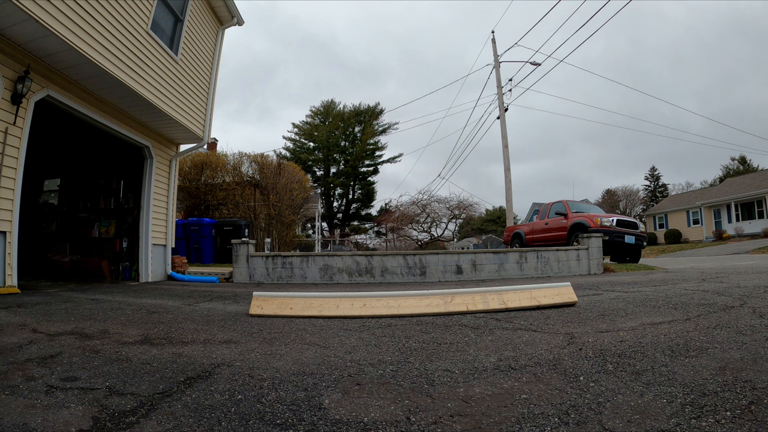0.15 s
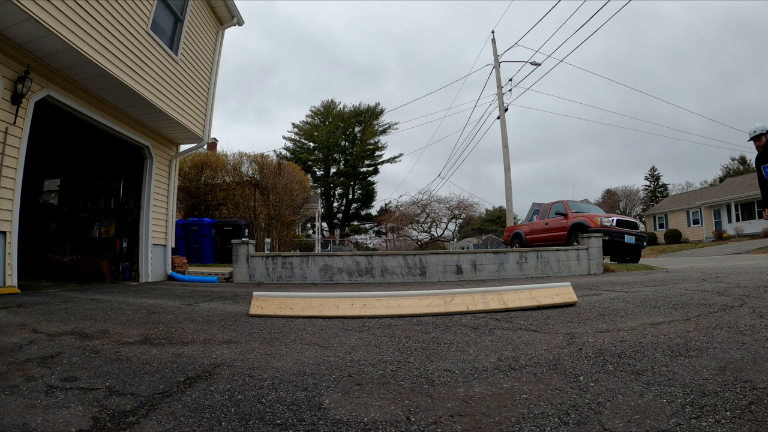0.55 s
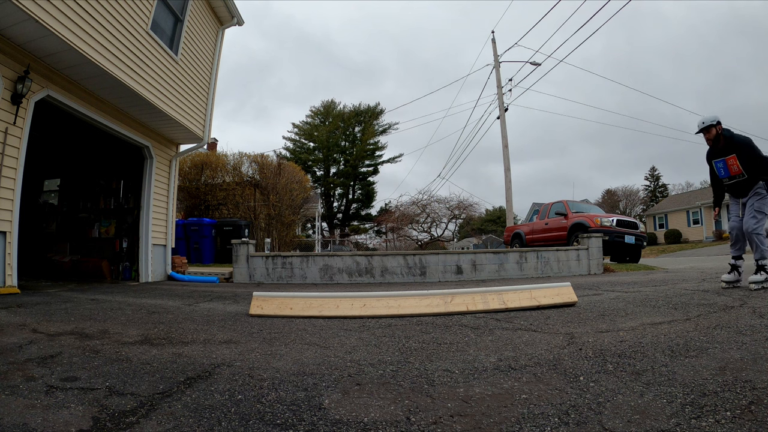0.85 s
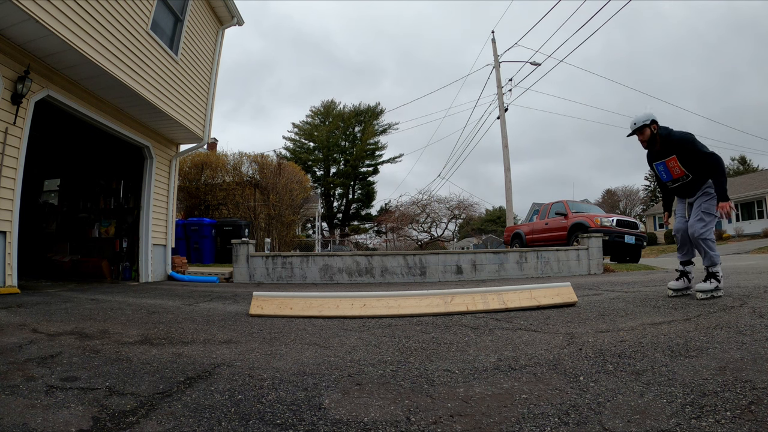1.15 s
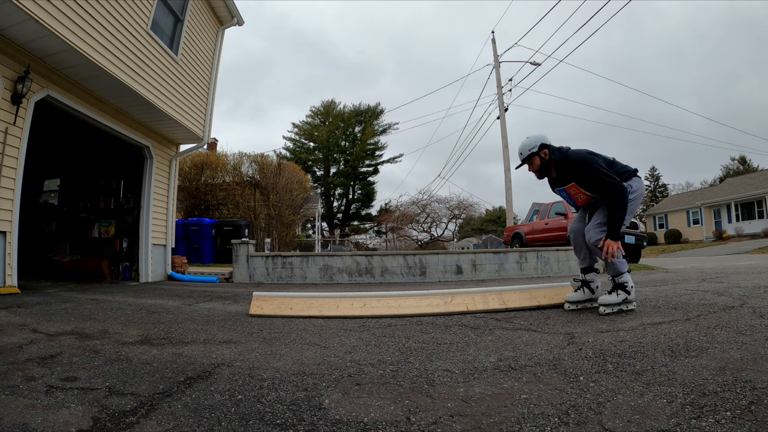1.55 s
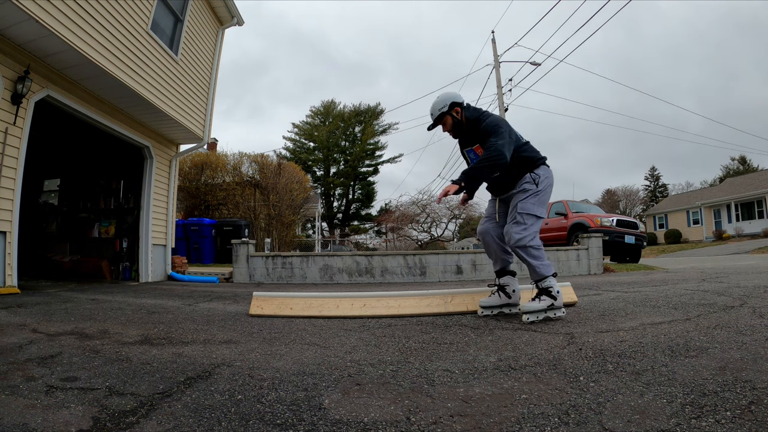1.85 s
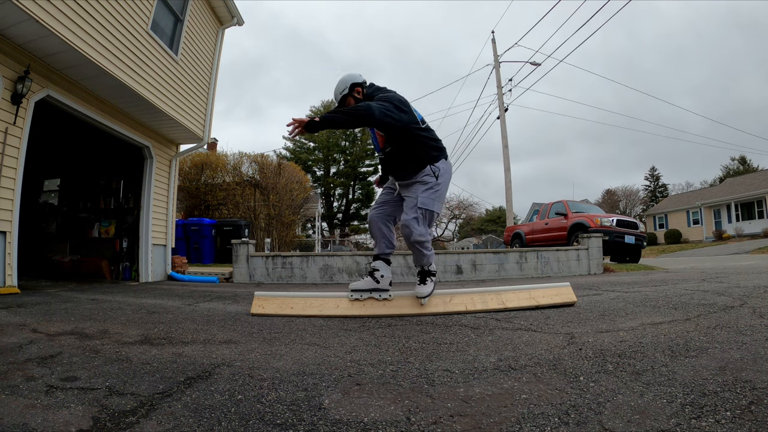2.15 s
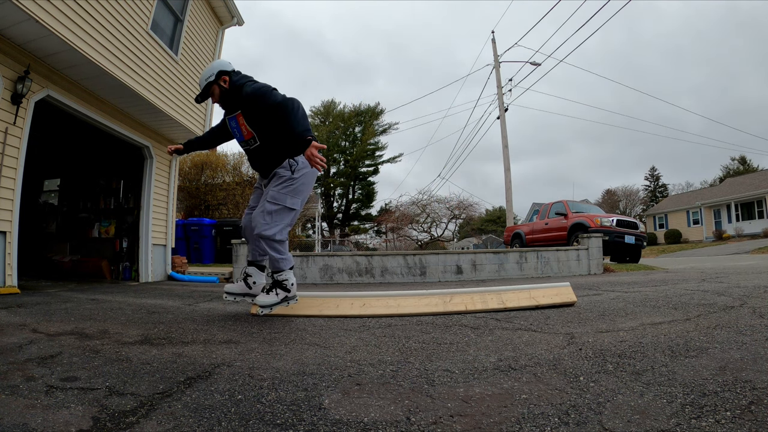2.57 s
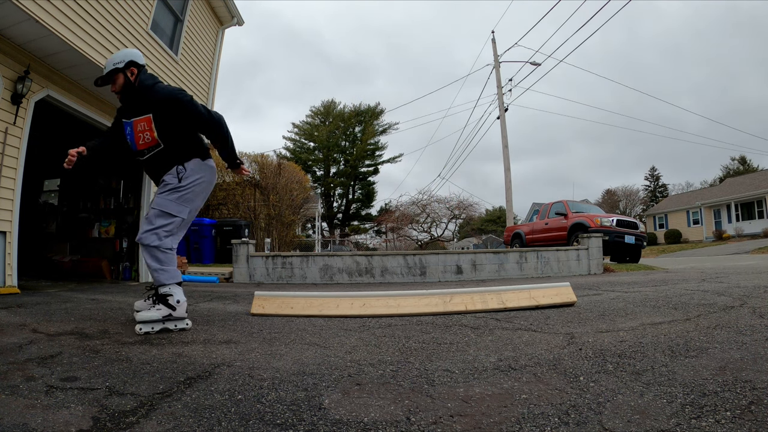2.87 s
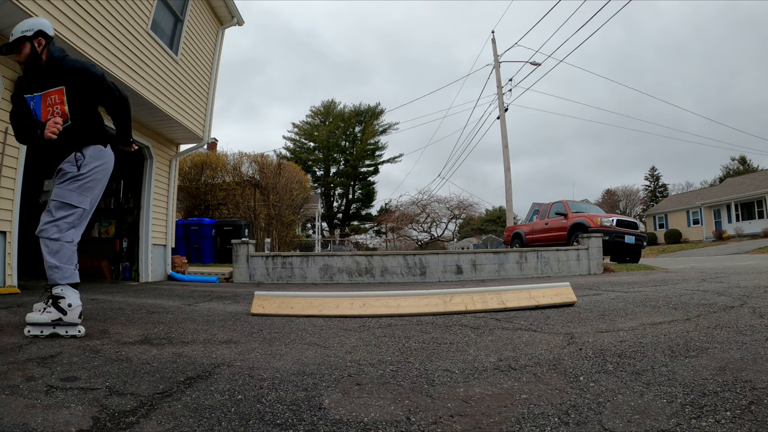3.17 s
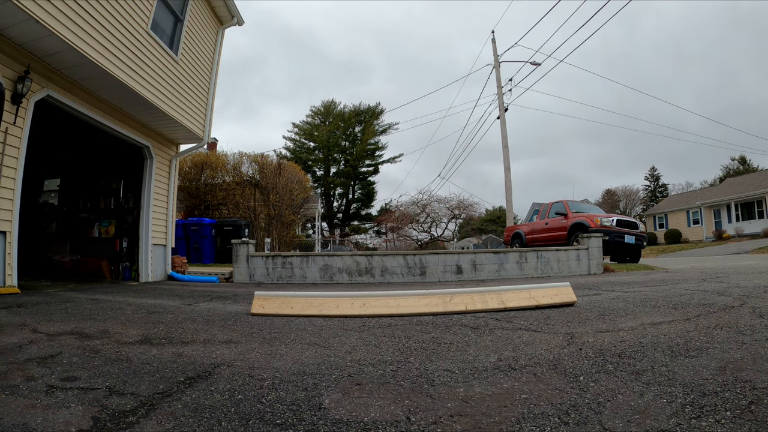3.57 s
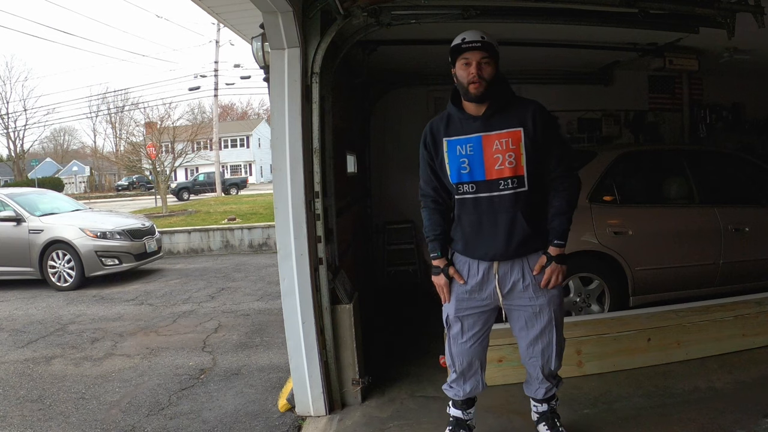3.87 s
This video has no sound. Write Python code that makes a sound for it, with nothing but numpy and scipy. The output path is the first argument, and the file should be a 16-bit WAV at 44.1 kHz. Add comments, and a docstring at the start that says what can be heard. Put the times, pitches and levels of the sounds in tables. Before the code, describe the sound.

Outdoors on a driveway, inline skate wheels rumble and crunch over coarse asphalt as a breeze buffets the microphone. After a hop, the skates knock loudly on a wooden ledge in a tight hollow burst, slide softly, groan briefly, then slap onto the pavement and roll away. A short echo comes off nearby walls.

```python
"""An inline skater rolls over rough asphalt: random stone impacts excite rumble, crunch and ringing frames.
From the start a breeze rumbles on the microphone as low filtered noise; scuffs and squirming wheels follow.
After a hop the skates knock on a wooden ledge, struck as damped modes with noise cracks, and the soles slide
along it; a stick-slip judder ends the slide, the wheels slap down on the asphalt and the skater rolls away.
Decaying noise gives the short echo of the garage wall."""
import sys
import numpy as np
from scipy import signal
from scipy.fft import rfft, irfft
from scipy.io import wavfile
from scipy.ndimage import uniform_filter1d, minimum_filter1d, map_coordinates

SR = 44100
rng = np.random.default_rng(int(sys.argv[2]) if len(sys.argv) > 2 else 0)


def persist_wave(psi):
    """Save psi, clipped to +-1, as 16-bit WAV."""
    counts = np.round(np.clip(psi, -1, 1) * 32767).astype(np.int16)
    wavfile.write(sys.argv[1], SR, np.atleast_2d(counts).T)


N = 177061
T = np.arange(N) / SR  # s

# bright spectrum of fine sand and of snapping stones: frequency_hz, level_db
RASP_COLOUR = [(1500, -29.5), (3000, 6), (4200, 6.5), (5500, -7), (7500, -10), (10500, -25), (15000, -35)]


def undb(db):
    """Level to amplitude: 20 dB is a factor of ten."""
    return 10 ** (np.asarray(db) / 20)


def unit(x):
    """Normalisation to an rms amplitude of 1."""
    return x / np.sqrt(np.mean(x ** 2))


def noise():
    """White noise: equal mean power at every frequency."""
    return rng.standard_normal(N)


def walk(rate):
    """Slow random modulation: held noise, redrawn rate times a second, is smoothed and scaled to rms 1."""
    k = int(SR / rate)
    held = np.repeat(noise()[:N // k + 1], k)
    return unit(uniform_filter1d(held, k)[:N])


def through(x, response):
    """Linear filtering: convolution of x with an impulse response."""
    return signal.fftconvolve(x, response)[:N]


def colour(x, points, size=8192):
    """Minimum-phase filtering: a causal response of unit energy with the given (Hz, dB) shape."""
    hz, db = np.transpose(points)
    f = np.maximum(np.arange(size // 2 + 1) * SR / size, 1)
    shape_db = np.interp(np.log(f), np.log(hz), db)
    cepstrum = irfft(np.log(undb(shape_db)))
    # folding the cepstrum onto positive time makes the response causal
    cepstrum[1:size // 2] *= 2
    cepstrum[size // 2 + 1:] = 0
    response = irfft(np.exp(rfft(cepstrum)))
    return through(x, response / np.linalg.norm(response))


def decay(t, t60):
    """Exponential damping: the amplitude falls 60 dB in t60 seconds."""
    return np.exp(-np.log(1000) * np.maximum(t, 0) / t60)


def envelope(s, rise, hold, t60):
    """Onset and damping: a straight rise from time s, a hold, then an exponential release."""
    return np.clip((T - s) / rise, 0, 1) * decay(T - s - rise - hold, t60)


def ring(modes):
    """Modal synthesis: half a second of damped sines, varied a little by the load and the spot struck."""
    detune_hz, arrival_s, balance_db = 14.3, .0015, 2
    hz, db, t60 = np.transpose(modes)[:, :, None]
    hz = hz + detune_hz * rng.uniform(-0.99, 1, hz.shape)
    t = np.maximum(T[:SR // 2] - arrival_s * rng.random(db.shape), 0)
    gain = undb(db + balance_db * rng.standard_normal(db.shape))
    partials = gain * np.sin(2 * np.pi * hz * t) * decay(t, t60)
    return np.sum(partials, axis=0) / np.linalg.norm(gain)


def tilted(modes, tilt_db):
    """Spectral tilt: the same modes, weighted by tilt_db per octave above the first."""
    return [(hz, db + tilt_db * np.log2(hz / modes[0][0]), t60) for hz, db, t60 in modes]


def grains(rate, spread_db):
    """Random impulse train: rate tiny impacts a second on average, of uneven size and either sign."""
    hit = rng.random(N) < rate / SR
    size = undb(spread_db * np.minimum(rng.exponential(size=N), 4))
    return unit(hit * size * np.sign(noise()))


def add(out, s, sound):
    """Superposition: mix a sound in at time s."""
    i = int(s * SR)
    out[i:i + len(sound)] += sound[:N - i]


def frame(pitch):
    """Resonance of one wheel frame: its modes scaled by a pitch ratio."""
    # wheel frame modes: frequency_hz, level_db, t60_s
    frame_modes = [(1022, 1.5, 0.029), (1148, 5, 0.023), (1340, -11.5, 0.057)]
    return ring([(hz * pitch, db, t60) for hz, db, t60 in frame_modes])


def rolling():
    """Roughness excitation: stones shake boots and ground, crunch under the wheels and ring the frames."""
    # spells of rolling (approach, push stroke, crouch before the hop, run-out):
    # start_s, rise_s, hold_s, release_t60_s, speed_m_s, nearest_s,
    # rumble_db, grit_db, frame_ring_db, ground_tremor_db
    rolls = [(-.3, 0.92, 1.23, 0.94, 3.26, 4.2, -22.5, -37.5, -25, -35.5),
             (0.418, 0.055, 0.082, 0.13, 4.2, 2.2, -35.5, -45.5, -48, -55),
             (1.564, 0.043, 0.14, 0.15, 3.76, 1.63, -29.5, -45, -43, -49),
             (2.75, 0.096, 0.94, 1.45, 3.3, 3.255, -30, -45.5, -41.5, -36.5)]
    # spectrum of the rolling boots at the reference speed: frequency_hz, level_db
    rumble_colour = [(50, -4.5), (100, 1), (140, 3.5), (185, 3.5), (250, -6), (360, -10), (600, -18.5),
                     (1000, -24.5), (2500, -87)]
    # spectrum of crunching grit: frequency_hz, level_db
    grit_colour = [(200, -8), (350, -4.5), (500, 3.5), (750, -6.5), (1100, -0.5), (1500, -1.5), (2100, -11),
                   (3000, -11.5), (4500, -20), (7000, -28), (10000, -39.5), (12000, -61.5), (15000, -59.5)]
    # spectrum of the shaken ground: frequency_hz, level_db
    ground_colour = [(12, -51), (25, 7.5), (42, 4.5), (75, -4.5), (120, -15), (190, -18), (500, -72)]
    # the two skates' frames ring a little apart: pitch_ratio
    skate_pitches = [.97, 1.054]
    rumble_at_m_s = 3.254  # a faster roll moves the rumble up in proportion
    nearest_m = 0.92  # distance at the closest pass
    grit_fall = 0.12  # the crunch fades with distance to this power
    grit_flutter_db, frame_flutter_db = 1.5, 2.2  # uneven asphalt

    stones = grains(rate=900, spread_db=1.0) * undb(1.5 * walk(25.05))
    grit = colour(grains(rate=2200, spread_db=2.0), grit_colour)
    grit = grit * undb(grit_flutter_db * walk(40))
    frames = 0
    for pitch in skate_pitches:
        ringing = through(grains(rate=450, spread_db=-0.5), frame(pitch))
        frames = frames + ringing * undb(frame_flutter_db * walk(21.94))
    frames = unit(frames)
    tremor = unit(colour(noise(), ground_colour))

    out = 0
    for s, rise, hold, t60, speed, nearest_s, rumble_db, grit_db, frame_db, tremor_db in rolls:
        boots = colour(stones, [(hz * speed / rumble_at_m_s, db) for hz, db in rumble_colour])
        near = nearest_m / np.hypot(nearest_m, speed * (T - nearest_s))  # 1 at the closest pass
        mix = boots * undb(rumble_db) + tremor * undb(tremor_db)
        mix = mix + grit * near ** grit_fall * undb(grit_db) + frames * near * undb(frame_db)
        out = out + envelope(s, rise, hold, t60) * mix
    return out


def outdoors():
    """Wind turbulence: a breeze with gusts buffets the microphone over the hush of distant streets."""
    # gusts: peak_s, half_width_s (to 1/e), level_db
    gusts = [(.35, 0.13, -32.5), (.58, 0.062, -22), (0.961, 0.063, -26), (1.942, 0.036, -27),
             (3.932, 0.058, -23)]
    # spectrum of the wind: frequency_hz, level_db
    wind_colour = [(12, -14), (25, -9.5), (42, -3.5), (75, 5.5), (120, -0.5), (190, -19), (500, -75.5)]
    # spectrum of the distant neighbourhood: frequency_hz, level_db
    air_colour = [(80, 7), (250, -2.5), (500, -9.5), (1000, -2), (2000, -12.5), (3000, -21), (5000, -25),
                  (8000, -42.5), (11000, -45.5), (15500, -59)]
    breeze_db, air_db = -37, -42.5
    strength = undb(breeze_db)
    for s, width, db in gusts:
        strength = strength + undb(db) * np.exp(-((T - s) / width) ** 2)
    wind = unit(colour(noise(), wind_colour)) * strength
    air = undb(air_db) * colour(noise(), air_colour) * undb(1 * walk(3.17))
    return wind + air


def scuffs():
    """Granular friction: wheels pushed sideways scrape grit in uneven skips; fine sand rasps brightly."""
    # sideways scuffs: start_s, length_s, scrape_db, rasp_db
    scuff_table = [(0.356, 0.061, -32.5, -47), (0.468, 0.094, -39.5, -48), (0.524, 0.045, -66, -47),
                   (1.602, 0.045, -34.5, -48), (1.671, 0.044, -35.5, -47.5), (1.734, 0.091, -46, -63),
                   (1.867, 0.0089, -51, -46.5), (1.925, 0.29, -41, -55), (2.752, 0.034, -34, -35.5),
                   (3.238, 0.017, -38, -52.5), (3.467, 0.027, -33, -44), (3.891, 0.073, -37.5, -51),
                   (3.97, 0.092, -43, -49)]
    # spectrum of the scrape: frequency_hz, level_db
    scrape_colour = [(300, 6), (700, 7), (1170, 9.5), (1700, 2.5), (2400, 0), (3200, -2.5), (4300, -18),
                     (5500, -13.5), (7200, -16.5), (10500, -26), (15000, -43)]
    rise, hold, release = 0.17, 0.31, 6.3  # rise, hold and release t60, in scuff lengths
    scrape, rasp = 0, 0
    for s, length, scrape_db, rasp_db in scuff_table:
        push = envelope(s, rise * length, hold * length, release * length)
        scrape = scrape + undb(scrape_db) * push
        rasp = rasp + undb(rasp_db) * push
    skips = undb(2.0 * walk(160))
    scrape_grains = scrape * skips * grains(rate=2600, spread_db=3.0)
    rasp_grains = rasp * skips * grains(rate=2900, spread_db=3.0)
    return colour(scrape_grains, scrape_colour) + colour(rasp_grains, RASP_COLOUR)


def squirm():
    """Friction-driven resonance: leaned wheels sing faintly; the pitch slides as the load shifts."""
    # squirms in the push-off and the final turn: start_s, rise_s, hold_s, release_t60_s,
    # level_db, pitch_ratio, glide_octaves_per_s, tilt_db_per_octave
    squirms = [(0.357, 0.0027, 0.0099, 0.065, -30.5, 1.04, -2.5, -7),
               (0.377, 0.0082, 0.015, 0.08, -35.5, 1.03, 3, 2),
               (3.66, 0.04, 0.025, 0.12, -58, 1.79, -0.5, 22),
               (3.705, 0.031, 0.031, 0.48, -45, 1.03, -0.4, 4)]
    # wheel modes: frequency_hz, level_db, t60_s
    wheel_modes = [(1690, 10.5, 0.016), (2294, 10, 0.014), (3360, 2, 0.011)]
    waver_octaves = 0.014  # rms wander of the pitch
    out = 0
    for s, rise, hold, t60, db, pitch, glide, tilt_db in squirms:
        song = unit(through(grains(rate=3200, spread_db=5.5), ring(tilted(wheel_modes, tilt_db))))
        octaves = glide * np.clip(T - s, 0, rise + hold + t60) + waver_octaves * walk(45)
        playback_rate = pitch * 2 ** octaves
        # reading the song at a varying rate bends its pitch
        bent = map_coordinates(song, [np.cumsum(playback_rate)], mode="mirror")
        out = out + undb(db) * envelope(s, rise, hold, t60) * bent
    return out


def snaps():
    """Impulsive fracture: single stones crack from under the wheels as short damped noise bursts."""
    # snapping stones: start_s, level_db
    snap_table = [(1.623, -33), (1.632, -33), (1.643, -31.5), (1.684, -45), (1.872, -42), (2.7585, -39),
                  (2.8027, -34)]
    rise_s, t60_s = 0.00046, 0.012
    bursts = sum(undb(db) * envelope(s, rise_s, 0, t60_s) for s, db in snap_table)
    return colour(noise() * bursts, RASP_COLOUR)


def blows(table, modes, crack_colour, crack_t60, tail_db, tail_t60, contact_s, low_hz=65):
    """Impact excitation: each blow rings a body, with a hard crack and a short rattle of loose skate parts."""
    body, cracks, shake_power = np.zeros(N), np.zeros(N), np.zeros(N)
    t = T[:SR // 2]
    crack_shape = decay(t, crack_t60) * np.clip(t / contact_s, 0, 1)
    for s, thud_db, crack_db, tilt_db in table:
        add(body, s, undb(thud_db) * ring(tilted(modes, tilt_db)))
        add(cracks, s, undb(crack_db) * crack_shape * rng.standard_normal(len(t)))
        add(shake_power, s, (undb(crack_db + tail_db) * decay(t, tail_t60)) ** 2)
    rattle = np.sqrt(shake_power) * grains(rate=2400, spread_db=3.5)
    # a small body radiates little deep bass
    high_pass = signal.butter(3, low_hz, "high", fs=SR, output="sos")
    return signal.sosfilt(high_pass, body) + colour(cracks + rattle, crack_colour)


def chatter(count):
    """Repeated rebound: evenly spaced bounces of the wheels after the hard landing, each one weaker."""
    start_s, gap_s, fall_db = 2.739, .0102, 2.5
    first_db = np.array([-8.5, -25, -22.5])  # thud, clack and frame ring
    return [(start_s + k * gap_s, *(first_db - k * fall_db), 1) for k in range(count)]


def touchdowns():
    """Impact on a rigid ground: the boot thuds, the wheels clack and the frame rings."""
    # wheels hitting the asphalt: start_s, thud_db, clack_db, frame_ring_db, frame_pitch_ratio
    ground_blows = [(1.768, -33, -43, -19, 1.02), (1.828, -34, -52, -24, 0.95),
                    (2.7208, -11.5, -18, -21, 1.04), (2.7226, -22, -14.5, -31, 0.89),
                    (2.7258, -7.5, -7.5, -24, 1.7), (2.7278, -13, -13, -23, 1.2),
                    (2.9675, -47, -38, -39, 0.94), (2.997, -40, -34, -33, 1.02),
                    (3.064, -19, -31.5, -24, 0.97), (3.9, -48, -35, -25.5, 1.2),
                    (3.912, -27, -36, -20, 1.18)]
    # modes of a loaded boot on its wheels: frequency_hz, level_db, t60_s
    boot_modes = [(95, -5, 0.018), (150, 7, 0.085), (204, 13, 0.049), (285, 12.5, 0.031), (380, 2.5, 0.025),
                  (670, 0, 0.036), (1120, -15.5, 0.02), (1300, -21, 0.023)]
    # spectrum of the wheels' clack: frequency_hz, level_db
    clack_colour = [(200, 14), (700, 9), (1400, 0.5), (2180, 6), (2800, 1), (3400, 2), (3820, 8.5),
                    (4500, -3.5), (5200, -5), (6500, -16), (7700, -3.5), (8600, -18), (9500, -28),
                    (12000, -25), (15500, -40)]
    hits = ground_blows + chatter(count=4)
    boots = [(s, thud_db, clack_db, 0) for s, thud_db, clack_db, _, _ in hits]
    out = blows(boots, boot_modes, clack_colour, crack_t60=0.016,
                tail_db=-20.0, tail_t60=0.2, contact_s=0.00064)
    for s, _, _, frame_db, pitch in hits:
        add(out, s, undb(frame_db) * frame(pitch))
    return out


def clatter(rise_s=.002):
    """Loose-joint rattle: wheels click on their axles in a dense random run around each landing."""
    # rattles around the landings: start_s, hold_s, release_t60_s, level_db
    clatters = [(2.089, 0.043, .12, -33), (2.725, 0.058, 0.1, -39.5)]
    # spectrum of the hard clicks: frequency_hz, level_db
    click_colour = [(500, -1), (1500, -1), (2800, -2), (4200, 0), (5500, -3), (7500, -5.5), (10000, -16),
                    (12500, -21), (15500, -32)]
    strength = sum(undb(db) * envelope(s, rise_s, hold, t60) for s, hold, t60, db in clatters)
    return colour(strength * grains(rate=900, spread_db=2.5), click_colour)


def slide():
    """Sliding friction: soles rub along waxed wood as dense grains scaled by the pressure."""
    # rubbing soles (landing, glide, catch, last push): start_s, hold_s, level_db
    slides = [(2.096, 0.068, -16.5), (2.183, 0.48, -40), (2.482, 0.072, -35), (2.635, 0.054, -28.5)]
    # spectrum of the rubbing: frequency_hz, level_db
    slide_colour = [(40, -23), (110, -1), (200, -2.5), (330, 1.5), (600, -7), (1100, -14.5), (2000, -18),
                    (3000, -25.5), (5000, -33), (8000, -38.5), (10000, -48), (12000, -60), (15000, -76)]
    rise_s, t60_s = 0.017, 0.18
    pressure = sum(undb(db) * envelope(s, rise_s, hold, t60_s) for s, hold, db in slides)
    return colour(grains(rate=3900, spread_db=2.5) * pressure, slide_colour)


def knocks():
    """Impact on a modal body: heel, then toe, rings the wooden ledge; a hard frame adds a bright tick."""
    # boots and frames striking the ledge, on the hop and at its far end; a hard edge rings it brightly,
    # the full weight dully: start_s, thud_db, crack_db, tick_db, tilt_db_per_octave
    ledge_blows = [(2.0989, -11, -5, -8, 5), (2.103, -11, -16, -24, 0), (2.114, -7, -14, -26, -3.5),
                   (2.1212, -8.5, -9, -28, 0), (2.125, -9, -20, -38, 0.5), (2.1375, -11.5, -6.5, -31, 7.5),
                   (2.1432, -5.5, -20, -32, -3), (2.151, -7, -2.5, -9, -2.5), (2.1543, -8.5, -7, -25, -4.5),
                   (2.166, -3.5, -32, -39, -3), (2.1806, -16, -11.5, -40, 2), (2.4813, -36, -28, -41, -2),
                   (2.4936, -31, -24, -35, 4), (2.512, -28, -25, -35, 0), (2.527, -39, -19, -35, 0),
                   (2.554, -32, -21.5, -31, 7), (2.5864, -26.5, -24, -48, -1),
                   (2.6503, -24, -30, -37, -0.5)]
    # modes of the wooden ledge: frequency_hz, level_db, t60_s
    ledge_modes = [(74.5, -1.5, 0.077), (107.6, -2, 0.4), (146.3, 3, 0.14), (182.6, 7, 0.022),
                   (223, 3.5, 0.1), (250.4, 2.5, 0.12), (291.3, 1.5, 0.14), (339, 2.5, 0.11),
                   (402, 5, 0.14), (486, 2, 0.06), (580, 5, 0.048), (659, 2.5, 0.093), (680, 2, 0.064),
                   (858, -0.5, 0.066), (996, 4, 0.039), (1160, -9, 0.09), (1224, -13, 0.15),
                   (1352, -10, 0.11), (1680, -4.5, 0.092), (1790, -5.5, 0.084), (2056, -10, 0.09),
                   (2810, -8.5, 0.059)]
    # spectrum of the crack: frequency_hz, level_db
    crack_colour = [(150, 3.5), (400, 9.5), (900, 7), (1800, 3), (2700, -2), (3300, -4), (4200, -8),
                    (5200, -16), (7300, -45), (10000, -34), (12000, -43), (15500, -52)]
    # spectrum of a hard frame striking the ledge's edge: frequency_hz, level_db
    tick_colour = [(300, -13), (1500, 9), (3200, -1.5), (4300, 9.5), (5300, -5), (6800, 2.5), (8200, -4.5),
                   (10000, -5.5), (12000, -28), (15500, -41)]
    toe_lag_s, toe_scatter = 0.0046, .3  # the scatter is a fraction of the lag
    toe_thud_db, toe_crack_db = -4, -8.5  # relative to the heel
    tick_rise_s, tick_t60_s = 0.0002, 0.0064
    lags = toe_lag_s * (1 + toe_scatter * rng.uniform(-1, 1, len(ledge_blows)))
    heels = [(s, thud_db, crack_db, tilt_db) for s, thud_db, crack_db, _, tilt_db in ledge_blows]
    toes = [(s + lag, thud_db + toe_thud_db, crack_db + toe_crack_db, tilt_db)
            for (s, thud_db, crack_db, tilt_db), lag in zip(heels, lags)]
    strikes = sum(undb(db) * envelope(s, tick_rise_s, 0, tick_t60_s) for s, _, _, db, _ in ledge_blows)
    ledge = blows(heels + toes, ledge_modes, crack_colour, crack_t60=0.019,
                  tail_db=-18.5, tail_t60=0.15, contact_s=0.0006)
    return ledge + colour(noise() * strikes, tick_colour)


def judder(jitter=0.1, ledge_db=-7):
    """Stick-slip oscillation: the sole grips and slips, slower under weight, and shakes the ledge's end."""
    # modes of the ledge's free end: frequency_hz, level_db, t60_s
    edge_modes = [(206, 3, 0.026), (345, 3, 0.025), (436, 7, 0.048), (625, -16, 0.027), (1004, -2, 0.042),
                  (1178, -3, 0.051)]
    level_db, loaded_hz, unloaded_hz = -17, 290.5, 333.3
    load = envelope(2.642, rise=0.033, hold=0.014, t60=0.067)
    hz = unloaded_hz + (loaded_hz - unloaded_hz) * load
    cycles = np.cumsum(hz * (1 + jitter * walk(300))) / SR
    groan = np.sin(2 * np.pi * cycles) * undb(1.0 * walk(350))
    scrape = unit(through(grains(rate=900, spread_db=0.5), ring(edge_modes)))
    return undb(level_db) * (unit(groan) * load + undb(ledge_db) * scrape * np.sqrt(load))


def diffuse_tail(x, wet_db, t60, treble_t60, build_s, split_hz=2500):
    """Diffuse decay: x is convolved with noise that builds up, its lows and treble then decaying apart."""
    t = T[:SR]
    scatter = colour(noise(), [(100, -1.5), (1000, -6.0), (4000, -8.5), (12000, 0.0)])[:SR]
    low_pass = signal.butter(2, split_hz, fs=SR, output="sos")
    lows = signal.sosfiltfilt(low_pass, scatter)
    treble = scatter - lows
    response = (lows * decay(t, t60) + treble * decay(t, treble_t60)) * np.clip(t / build_s, 0, 1)
    return undb(wet_db) * through(x, response / np.linalg.norm(response))


def scene():
    """Mid-side stereo: a common sound, with a faint bright decaying noise added left and subtracted right."""
    skates = rolling() + scuffs() + squirm() + snaps() + touchdowns()
    skates = skates + clatter() + slide() + knocks() + judder()
    # scattered echoes from the garage front and the low wall; their treble dies first
    echo = diffuse_tail(skates, wet_db=-15.0, t60=0.4, treble_t60=0.16, build_s=0.0097)
    mid = skates + echo + outdoors()
    # the difference of neighbouring samples favours the treble
    bright = np.diff(skates, prepend=0)
    side = diffuse_tail(bright, wet_db=-24.5, t60=0.073, treble_t60=0.34, build_s=0.0034)
    return np.array([mid + side, mid - side])


def limit(x, size):
    """Peak limiting: both channels' gain dips smoothly around each peak over the ceiling."""
    ceiling = .99
    gain = ceiling / np.maximum(np.abs(x).max(axis=0), ceiling)
    return x * uniform_filter1d(minimum_filter1d(gain, size), size)


def record(dry):
    """Band-limited pickup: hiss joins each channel, peaks are limited, silence opens quickly, the top is cut."""
    # spectrum of the microphone's own hiss: frequency_hz, level_db
    hiss_colour = [(1000, -5), (12500, -3.5), (14000, -3), (15500, -33)]
    hiss_db, start_s, top_hz = -77.5, .046, 15800
    opening = np.clip((T - start_s) / .001, 0, 1)
    hiss = undb(hiss_db) * np.array([colour(noise(), hiss_colour), colour(noise(), hiss_colour)])
    low_pass = signal.ellip(8, .2, 70, top_hz, fs=SR, output="sos")
    return signal.sosfilt(low_pass, limit(dry + hiss, size=21) * opening)


dry = scene()
out = record(dry)
persist_wave(out)
```